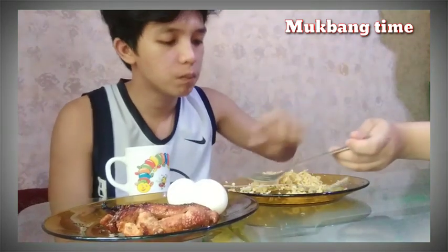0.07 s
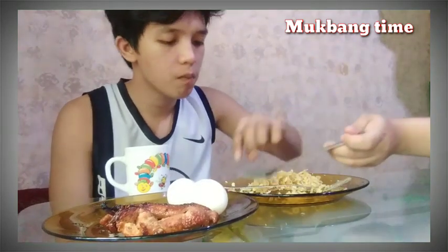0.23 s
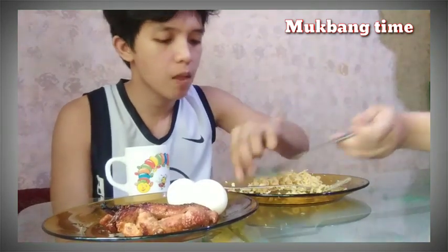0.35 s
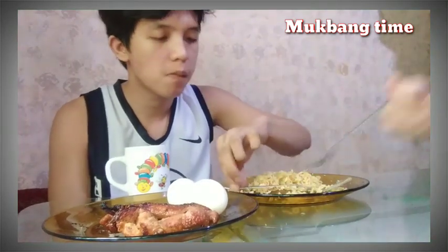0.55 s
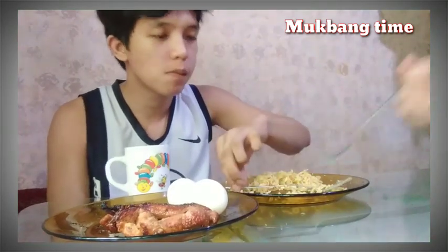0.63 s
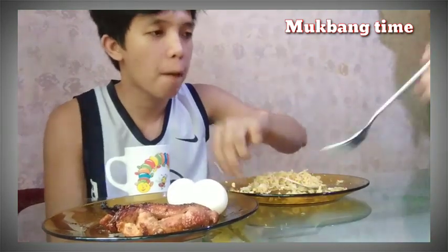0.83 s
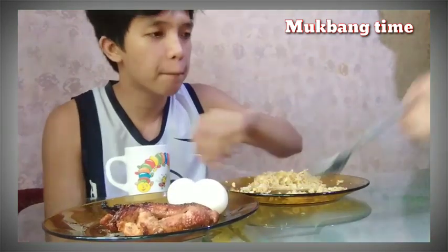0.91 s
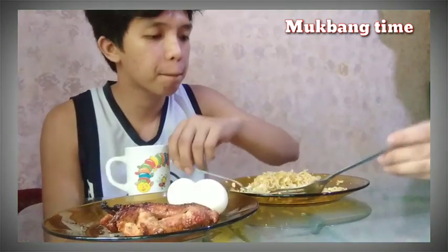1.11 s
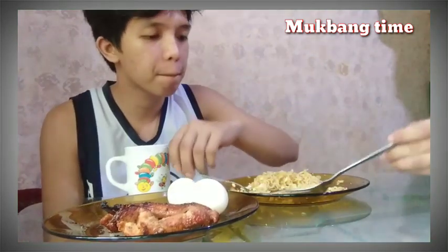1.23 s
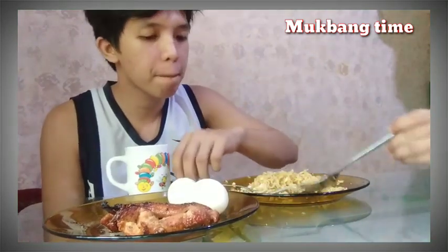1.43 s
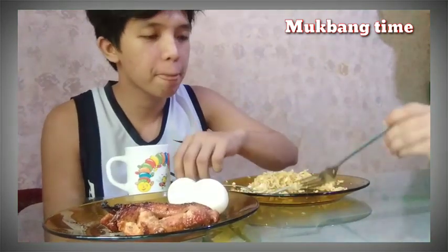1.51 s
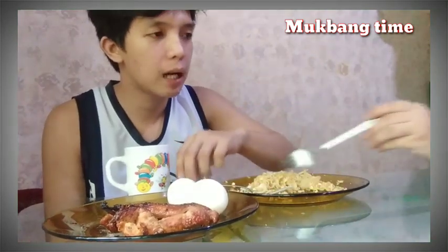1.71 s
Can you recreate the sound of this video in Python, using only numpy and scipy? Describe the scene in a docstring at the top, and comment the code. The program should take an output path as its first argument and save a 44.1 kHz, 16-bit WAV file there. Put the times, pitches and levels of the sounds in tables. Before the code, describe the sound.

A metal fork scrapes and chatters on a glass plate, then scrapes more softly. After a pause it knocks sharply with a dull table thud, followed by tiny squeaks and light clinks, close to the microphone in a small room.

```python
"""Steel fork on a glass plate

A fork knocks, chatters and scrapes on a plate, close to a phone in a small hard room. Each contact is a run of
tiny slips that drives the modes of plate and fork. A tine tip squeaks in short pips. The table thuds under one
of the blows and takes a soft bump, with fainter ones around it. Under it all lie a low room rumble and a thin,
high hiss."""
import sys
import numpy as np
from scipy import signal
from scipy.fft import rfft, irfft, next_fast_len
from scipy.io import wavfile
from scipy.ndimage import uniform_filter1d

SR = 44100
rng = np.random.default_rng(int(sys.argv[2]) if len(sys.argv) > 2 else 0)


def master_out(mix):
    """Clip the mix to full scale and print it as 16-bit PCM to the path in sys.argv[1]."""
    frames = np.transpose(np.atleast_2d(mix))
    ceiling = np.clip(frames, -1, 1)
    pcm = np.round(ceiling * 32767).astype(np.int16)
    wavfile.write(sys.argv[1], SR, pcm)


N = 77175


def amp(db):
    """Amplitude ratio of a level in dB."""
    return 10 ** (np.asarray(db) / 20)


def unit_rms(x):
    """Normalisation to an rms of 1."""
    return x / np.sqrt(np.mean(x ** 2) + 1e-20)


def log_interp(points, hz):
    """Interpolation of (f/Hz, value) points on a logarithmic frequency axis."""
    f, values = np.transpose(points)
    return np.interp(np.log(hz + 1), np.log(f + 1), values)


def filtered(x, response):
    """Linear filtering: the spectrum of x is multiplied by response(f)."""
    size = next_fast_len(x.shape[-1] + SR // 2)
    return irfft(rfft(x, size) * response(np.fft.rfftfreq(size, 1 / SR)), size)[..., :x.shape[-1]]


def minimum_phase(gain):
    """Causal response with a given magnitude, by folding the cepstrum."""
    cepstrum = irfft(np.log(gain + 1e-6))
    half = len(cepstrum) // 2
    cepstrum[1:half] *= 2
    cepstrum[half + 1:] = 0
    return np.exp(rfft(cepstrum))


def resonances(rows, f, shift_db=0):
    """Modal superposition: a squared band-pass for each row of f/Hz, width/Hz, level/dB."""
    gains = amp(np.array([db for _, _, db in rows]) + shift_db)
    return sum(gain * (1j * f * width / (hz * hz - f * f + 1j * f * width)) ** 2
               for gain, (hz, width, _) in zip(gains, rows))


def background_noise():
    """Spectrally shaped noise: a slightly patchy rumble and hiss, with two narrow bands heard as tones."""
    # f/Hz, relative spectral density/dB
    spectrum = [(15, -62.5), (25, -26.5), (60, -1), (125, 0.5), (172, -11), (354, -7), (383, -4),
                (450, -9.5), (879, -5.5), (1240, -7), (1810, -8.5), (3010, -13.5), (5280, -22.5),
                (7480, -1.5), (15000, -44)]
    # f/Hz, width/Hz, level/dB
    thin_tones = [(7575, 30, -76), (8455, 30, -78)]
    cells = signal.stft(rng.standard_normal(N), nperseg=512)[2]
    patches = uniform_filter1d(rng.standard_normal(cells.shape), 6, axis=0)
    patch_db = 1.5 * unit_rms(uniform_filter1d(patches, 12, axis=1))
    noise = signal.istft(cells * amp(patch_db), nperseg=512)[1][:N]
    out = amp(-63) * unit_rms(filtered(noise, lambda f: amp(log_interp(spectrum, f))))
    for hz, width, db in thin_tones:
        tone = filtered(rng.standard_normal(N), lambda f: resonances([(hz, width, 0)], f))
        out += amp(db) * unit_rms(tone)
    return out


def reverberation(x, delay_s=.004):
    """Diffuse field: each frequency decays at its own rate; each source spot gets a new noise tail."""
    # f/Hz, T60/s
    decay_times = [(300, 0.28), (2000, 0.28), (8000, 0.26), (15000, 0.19)]
    hz, t, cells = signal.stft(rng.standard_normal(len(x)), SR, nperseg=256)
    decay = amp(-60 * t / log_interp(decay_times, hz)[:, None])
    tail = signal.istft(cells * decay, SR, nperseg=256)[1]
    delayed = np.pad(x, (round(delay_s * SR), 0))
    return signal.fftconvolve(delayed, tail / np.linalg.norm(tail))[:len(x)]


def table_bumps(rise_cycles=.82):
    """Damped free vibration of the table top after soft pushes; its lower modes build up later."""
    # t/s, gain/dB
    pushes = [(1.324, -60.5), (1.4843, -37.5), (1.565, -49)]
    # f/Hz, relative level/dB, T60/s
    table_modes = [(117.9, 6, 0.11), (67, 1.5, 0.248), (187, 0.5, 0.059)]
    out, t = np.zeros(N + SR), np.arange(SR // 2) / SR
    ring = np.zeros(len(t))
    for k, (hz, db, t60) in enumerate(table_modes):
        build_up = 1 - np.exp(-(t * hz / rise_cycles) ** 2)
        ring += (-1) ** k * build_up * amp(db - 60 * t / t60) * np.sin(2 * np.pi * hz * t)
    for start, db in pushes:
        out[round(start * SR):][:len(t)] += amp(db) * ring
    return out[:N]


def table_thud(start_s=1.183, peak_db=-43, hz=393, width_hz=300, t60_s=.08):
    """Structure-borne sound: a blow passes through the plate to the table as a dull thud."""
    t = np.maximum(np.arange(N) / SR - start_s, 0)
    burst = amp(-60 * t / t60_s) * (t > 0) * rng.standard_normal(N)
    thud = filtered(burst, lambda f: resonances([(hz, width_hz, 0)], f))
    return amp(peak_db) * thud / np.abs(thud).max()


def tine_squeaks(rise_s=.001, t60_s=.007, phase_step_rad=.09, room_db=-12):
    """Stick-slip friction: a tine tip slips in short, rough pips, heard through the band it radiates."""
    # t/s, peak level before the tine's band/dB, f/Hz
    pips = [(1.3811, -24, 5440), (1.3855, -18, 5000), (1.4666, -28.5, 4810), (1.4695, -31.5, 5380),
            (1.472, -34, 4740), (1.53, -27.5, 5060), (1.5365, -26.5, 4910)]
    out, t = np.zeros(N + SR), np.arange(SR // 2) / SR
    envelope = (1 - np.exp(-(t / rise_s) ** 2)) * amp(-60 * t / t60_s)
    envelope /= envelope.max()
    for start, db, hz in pips:
        phase_wander = np.cumsum(rng.normal(0, phase_step_rad, len(t)))
        pip = envelope * np.sin(2 * np.pi * hz * t + phase_wander)
        out[round(start * SR):][:len(t)] += amp(db) * (pip + amp(room_db) * reverberation(pip))
    tine_hz, width_hz, gain_db = 5300, 2200, 1
    return filtered(out[:N], lambda f: resonances([(tine_hz, width_hz, gain_db)], f))


def friction_force(t, length_s, rise_s, slips_per_s=1500, spread_db=4, release_s=.004):
    """Sliding friction: noise and random micro-slips that rise, sag and die away as the contact ends."""
    slips = (rng.random(len(t)) < slips_per_s / SR) * amp(spread_db * rng.standard_normal(len(t)))
    force = (.5 + 1.2 * slips) * rng.standard_normal(len(t))
    attack = np.clip(t / rise_s, 0, 1)
    decay = np.exp(-.4 * t / length_s - np.maximum(t - length_s, 0) / release_s)
    return force * attack * decay


def fork_on_plate(plate_width_hz=62, spot_width_hz=190, spread_db=1.5, room_db=-1.5):
    """Forced vibration: each contact rings the plate, a dense clatter and three modes set by its spot."""
    # t/s, length/s, rise/s, level/dB, drive centre/Hz, drive width/octaves, clatter level/dB,
    # then three times: approximate f/Hz, relative level/dB of a mode that this spot drives
    contacts = [(0.058, 0.075, 0.0062, -64.5, 950, 0.22, -35, 920, 38, 800, -10, 1740, -13),
                (0.2253, 0.041, 0.0003, -16, 4840, 1.183, -10, 800, 3, 4355, -9.5, 2465, -6),
                (0.273, 0.021, 0.0009, -17.5, 4805, 1.37, -5, 5540, 4, 1940, -2, 1180, -12),
                (0.298, 0.052, 0.003, -20.5, 4860, 1.57, -9, 3348, -9, 4355, -4.5, 1940, -9.5),
                (.563, 0.0028, 0.0005, -51, 3460, 1.4, -20, 2180, 15, 3140, 12, 4700, 23),
                (0.582, 0.0073, 0.0011, -49, 5900, 1.6, -27, 3970, 22.5, 9830, 13, 4700, -12),
                (0.632, 0.11, 0.0035, -49, 3150, 0.67, -5, 1940, 9, 2890, 2.5, 3750, 5.5),
                (.682, 0.024, 0.01, -39, 2860, 0.64, -8, 1940, 7, 2890, 1.5, 5200, 10.5),
                (.693, 0.02, 0.0063, -37, 5900, 0.99, -12.5, 5560, 7.5, 6240, -1, 3450, 4),
                (1.1801, 0.0065, 0.00048, -20, 2800, 1.25, -6.5, 1740, 2, 3348, -5, 8170, 13),
                (1.189, 0.032, 0.00109, -28, 2450, 1.33, -14.5, 1872, -1, 800, -3.5, 2465, 1.5),
                (1.281, 0.019, 0.028, -40.5, 2450, 1.25, -34, 1740, 0, 1940, 1, 2465, -9),
                (1.3189, 0.0098, 0.00052, -31, 6670, 0.7, 5, 4110, 12, 8300, -9, 12340, 4),
                (1.463, 0.0042, 0.00073, -46, 9450, 1.6, -6, 7338, 14.5, 11030, -0.5, 13980, -6),
                (1.576, 0.0162, 0.0026, -35.5, 4400, 1.4, -5.5, 4700, 8.5, 3130, 5, 6630, 7.5),
                (1.5763, 0.0085, 0.001, -37.5, 4460, 1.3, -3, 5200, 14.5, 3750, 15, 2890, 7.5),
                (1.577, 0.0094, 0.00056, -40.5, 1570, 0.49, -12, 1510, 8, 920, -1, 1872, 3),
                (1.696, 0.025, 0.005, -50, 4670, 0.8, 3, 4110, 17.5, 5200, 17.5, 6630, 8)]
    # modes of the fork: f/Hz
    fork_hz = [800, 920, 1180, 1510, 1740, 1940, 2180, 2890, 3130, 3450, 3750, 3970, 4110, 4700, 5200, 6630,
               7930, 8200]
    # modes of the plate: f/Hz
    plate_hz = [1872, 2465, 2506, 3348, 4355, 5490, 5540, 6240, 6836, 7338, 7958, 8255, 9328, 9830, 11032,
                11500, 12340, 13300, 14300, 15398]
    # the same modes: relative level/dB
    plate_db = [-7.5, 1.5, 3.5, -9, -2.5, -3.5, -1.5, -7, 4.5, -0.5, -17.5, -15.5, -6.5, 1, -6, -4.5, -21.5,
                -8, -20.5, -19.5]
    # dense unresolved modes: f/Hz, relative spectral density/dB
    clatter_spectrum = [(200, -62.5), (400, -42), (800, -1), (1800, -1.5), (2300, -5.5), (4000, -9.5),
                        (7000, -2.5), (8300, -1), (8700, -15), (10000, -18), (15500, -34)]
    out, t = np.zeros(N + SR), np.arange(SR // 2) / SR
    f = np.fft.rfftfreq(len(t), 1 / SR)
    plate_modes = [(hz, plate_width_hz, db) for hz, db in zip(plate_hz, plate_db)]
    clatter = minimum_phase(amp(log_interp(clatter_spectrum, f)))
    for start, length, rise, db, centre_hz, octaves, clatter_db, *spot in contacts:
        drive_band = minimum_phase(np.exp(-.5 * (np.log2((f + 1) / centre_hz) / octaves) ** 2))
        drive = rfft(friction_force(t, length, rise)) * drive_band
        spot_modes = []
        for near_hz, mode_db in zip(spot[::2], spot[1::2]):
            mode_hz = min(fork_hz + plate_hz, key=lambda hz: abs(hz - near_hz))
            spot_modes.append((mode_hz, spot_width_hz, mode_db))
        glass = resonances(plate_modes, f, rng.normal(0, spread_db, len(plate_modes)))
        clink = resonances(spot_modes, f) + amp(clatter_db) * clatter
        direct = irfft(drive * (glass + clink), len(t))
        # Directivity: the plate beams upward, so the walls get less of its ring.
        to_walls = irfft(drive * (amp(-3.5) * glass + clink), len(t))
        heard = direct + amp(room_db) * reverberation(to_walls)
        peak_rms = np.sqrt(uniform_filter1d(direct ** 2, SR // 100).max())  # loudest 10 ms
        out[round(start * SR):][:len(t)] += amp(db) * heard / peak_rms
    return out[:N]


def scene():
    """Superposition: the pressures of all sources add in one channel."""
    return (fork_on_plate() + tine_squeaks() + table_thud() + table_bumps() + background_noise())[None]


def record(dry):
    """Saturation and band limiting: the phone rounds off the highest peaks and cuts the top treble."""
    ceiling, top_hz = .62, 15520
    rounded = dry / (1 + np.abs(dry / ceiling) ** 4) ** (1 / 4)
    return filtered(rounded, lambda f: f < top_hz)


dry = scene()
out = record(dry)
master_out(out)
```